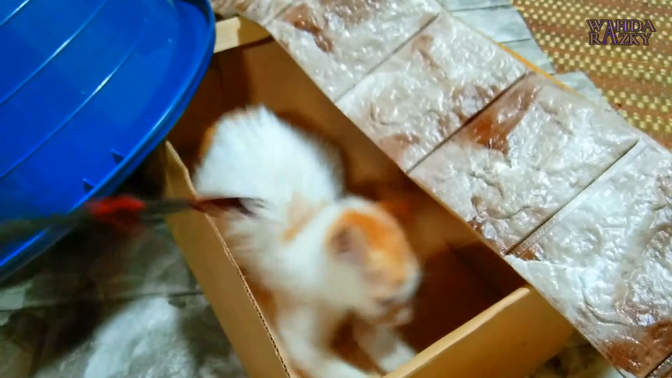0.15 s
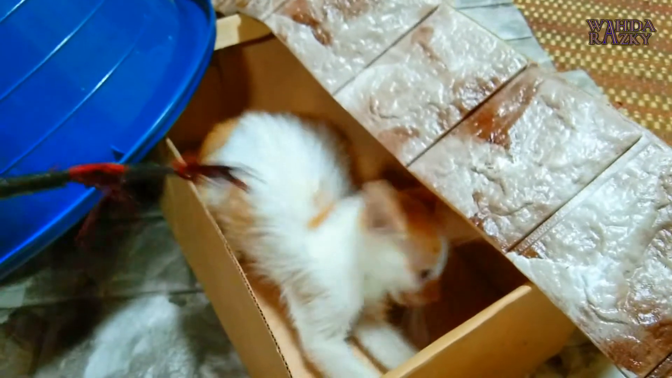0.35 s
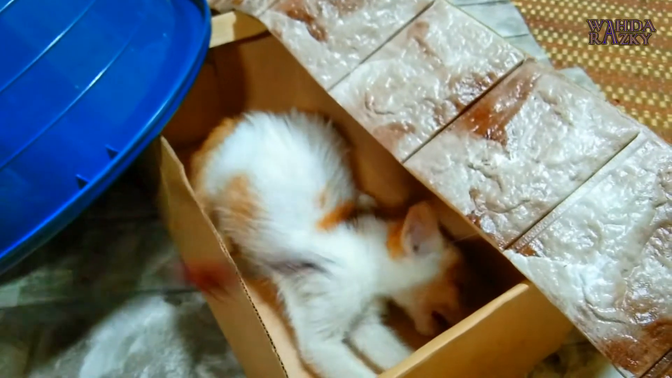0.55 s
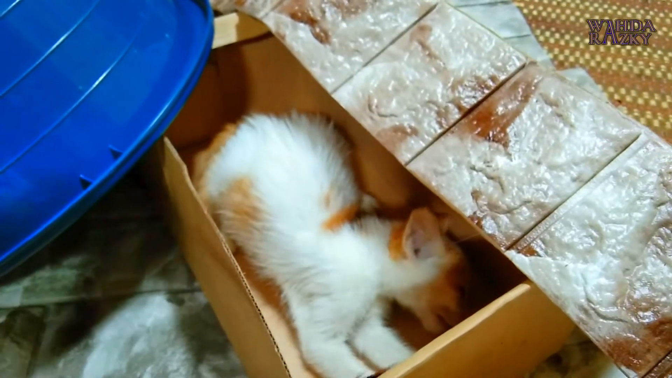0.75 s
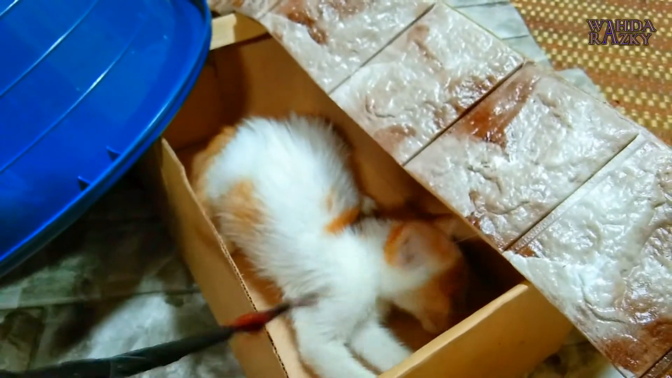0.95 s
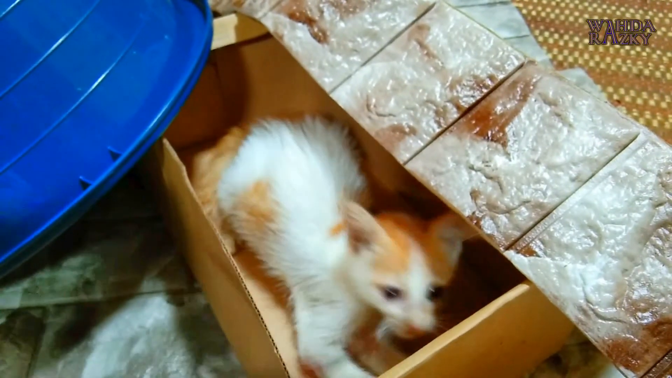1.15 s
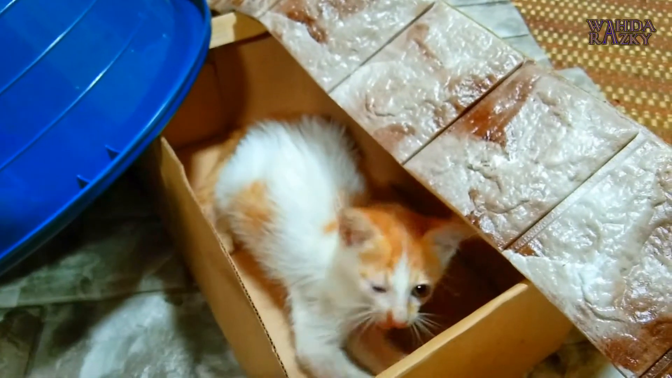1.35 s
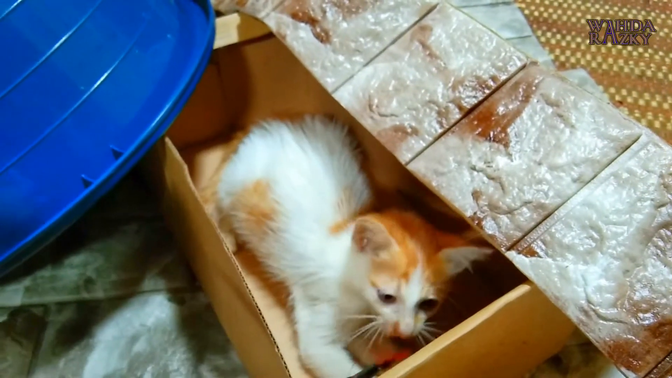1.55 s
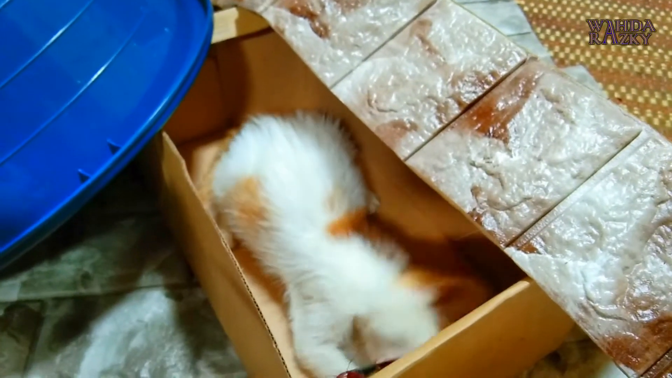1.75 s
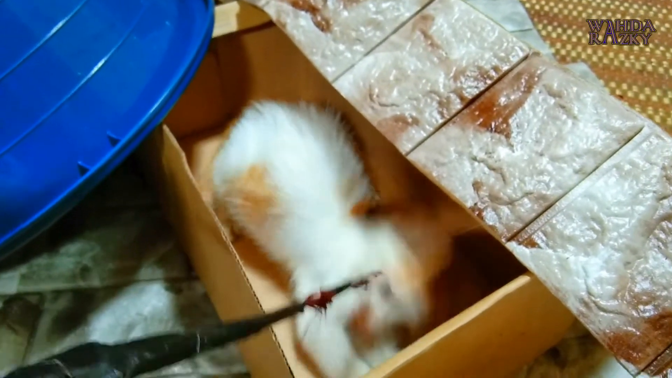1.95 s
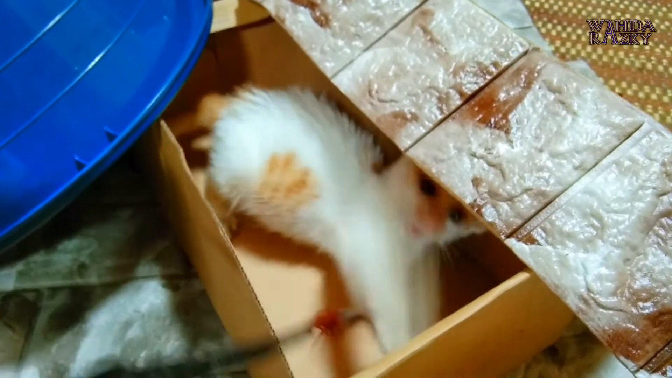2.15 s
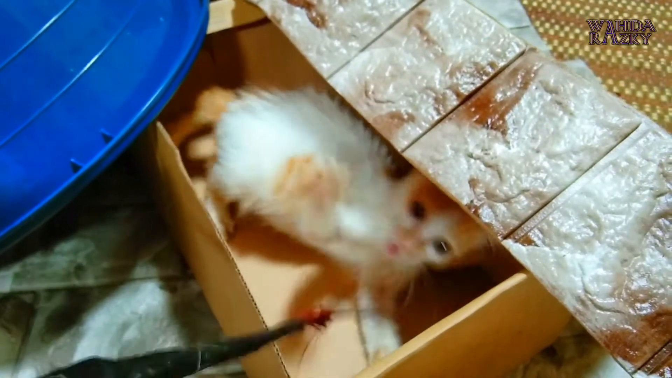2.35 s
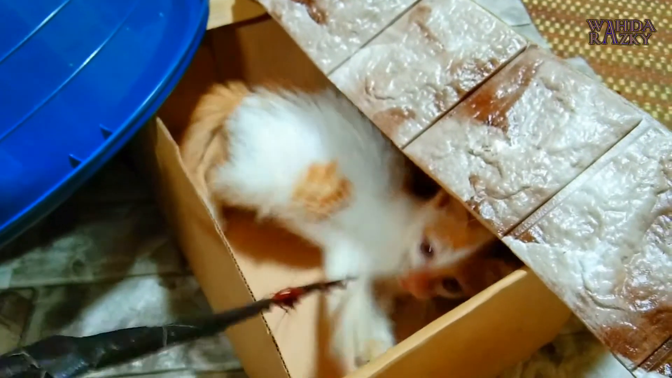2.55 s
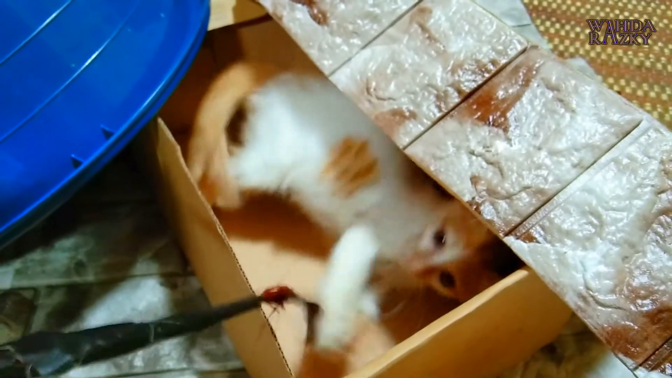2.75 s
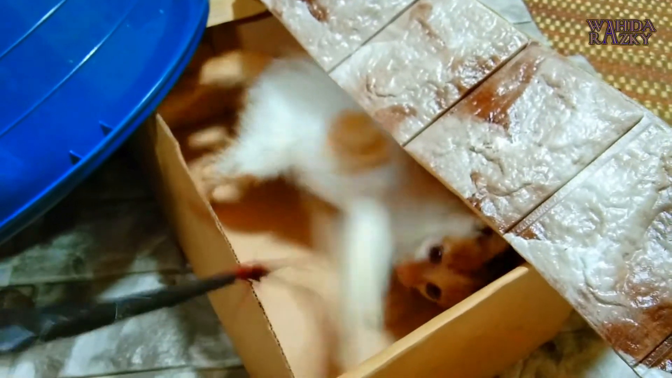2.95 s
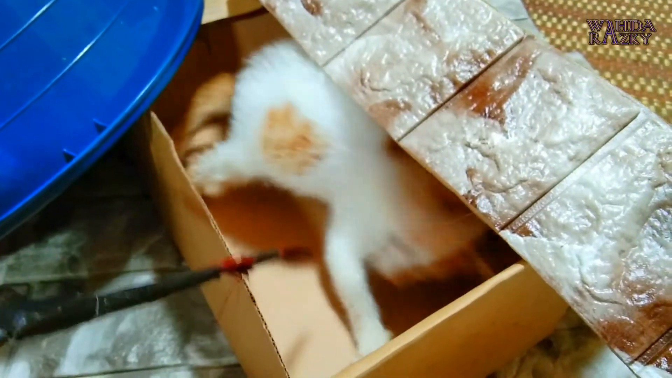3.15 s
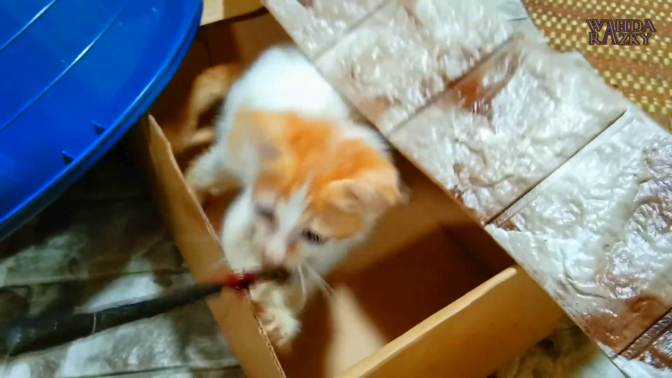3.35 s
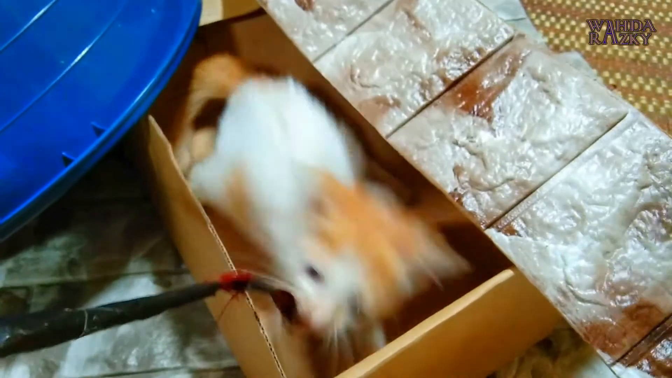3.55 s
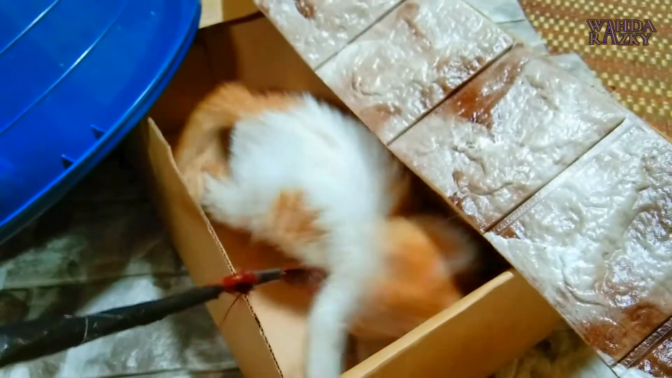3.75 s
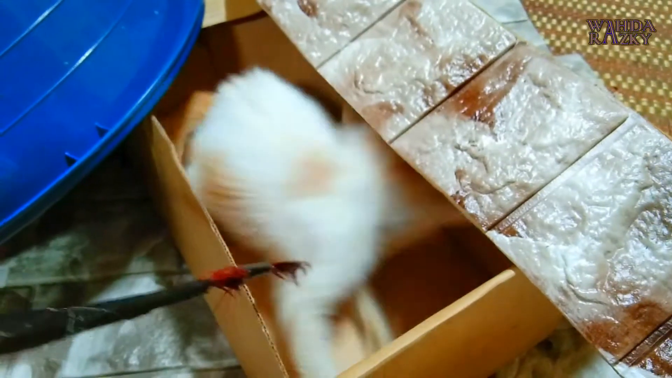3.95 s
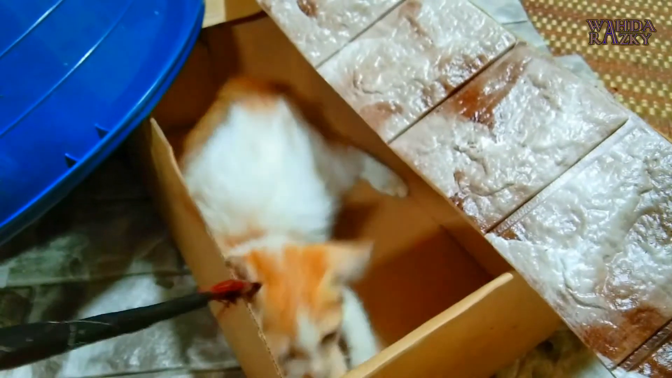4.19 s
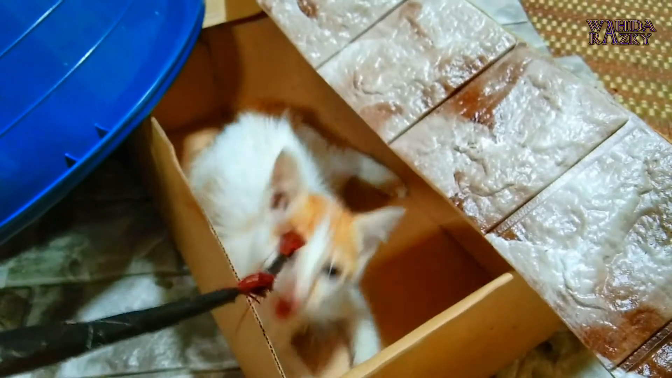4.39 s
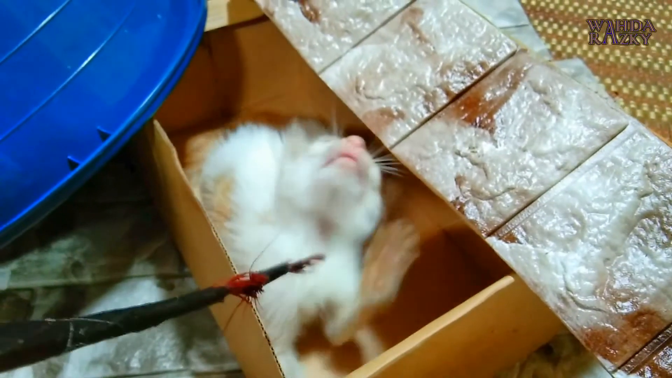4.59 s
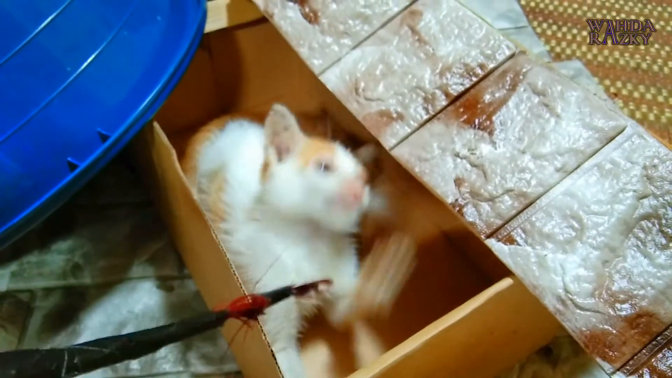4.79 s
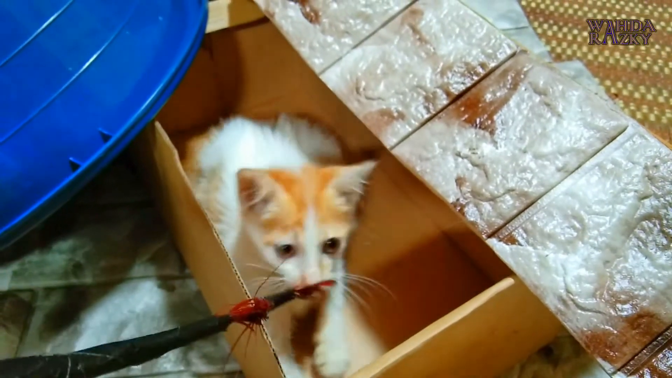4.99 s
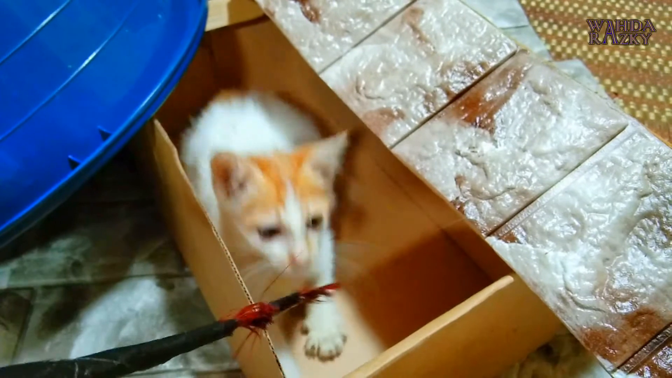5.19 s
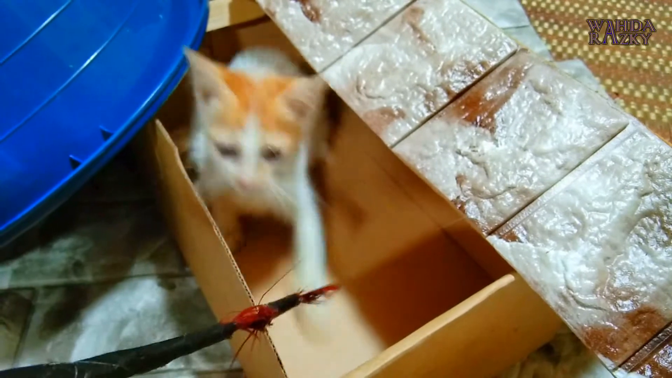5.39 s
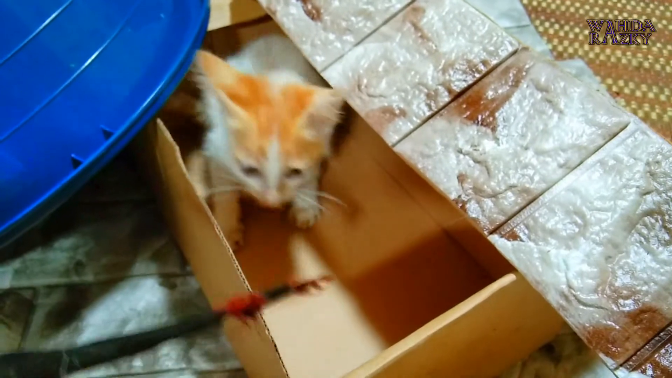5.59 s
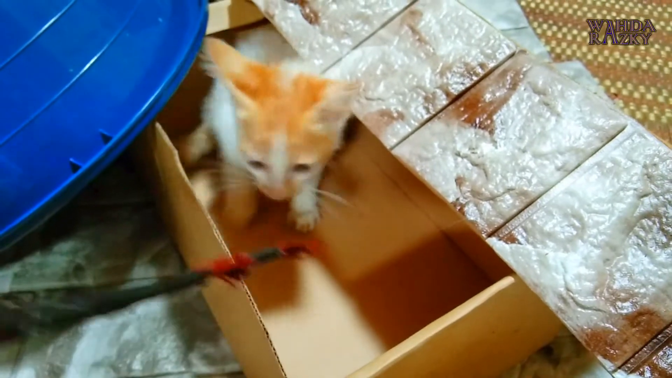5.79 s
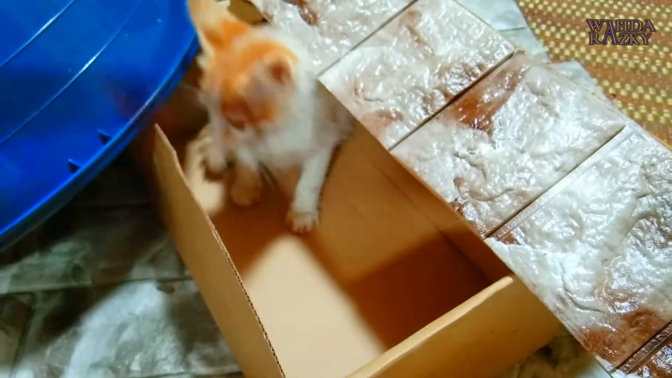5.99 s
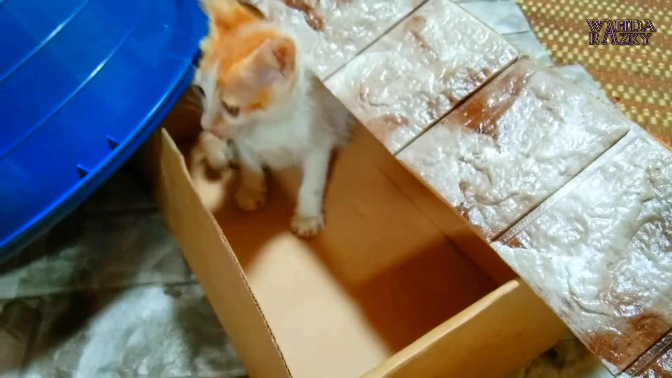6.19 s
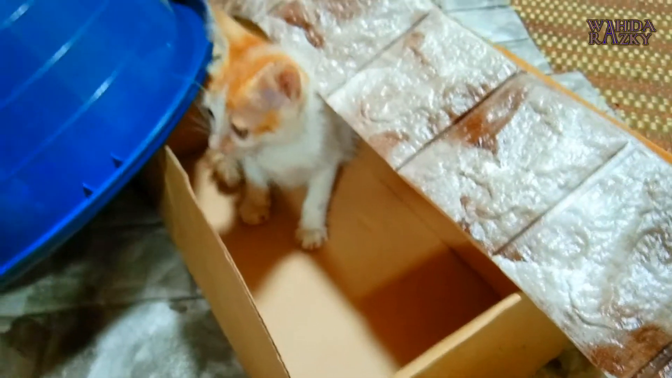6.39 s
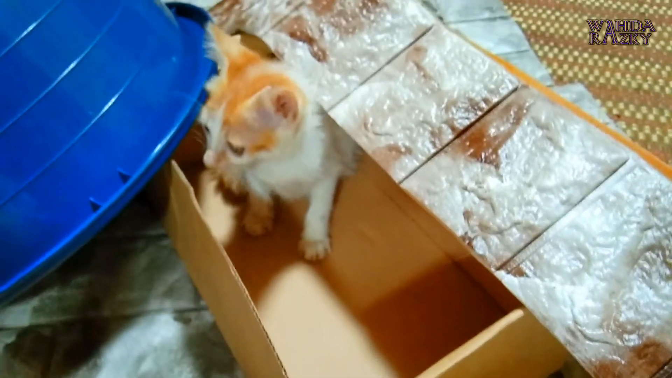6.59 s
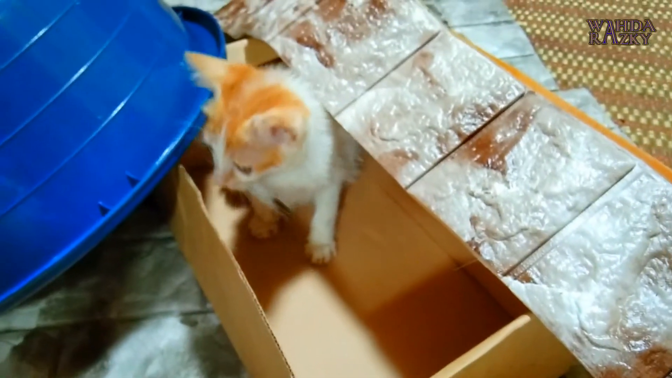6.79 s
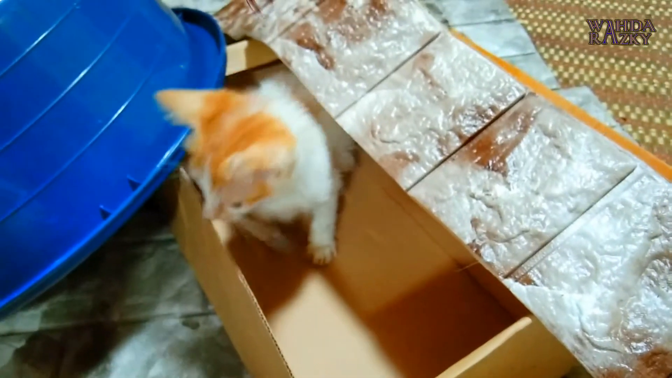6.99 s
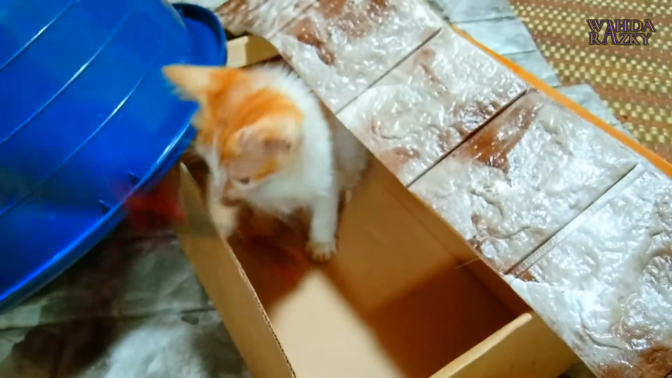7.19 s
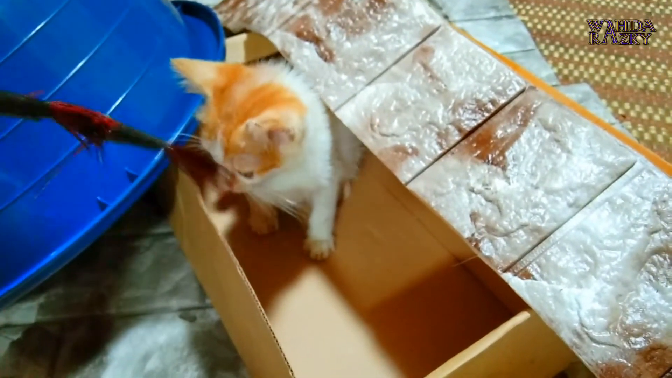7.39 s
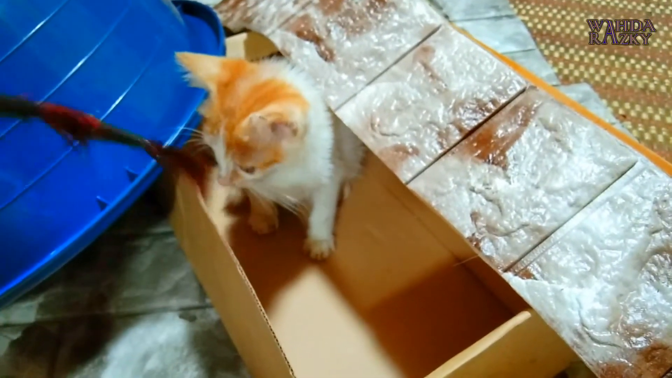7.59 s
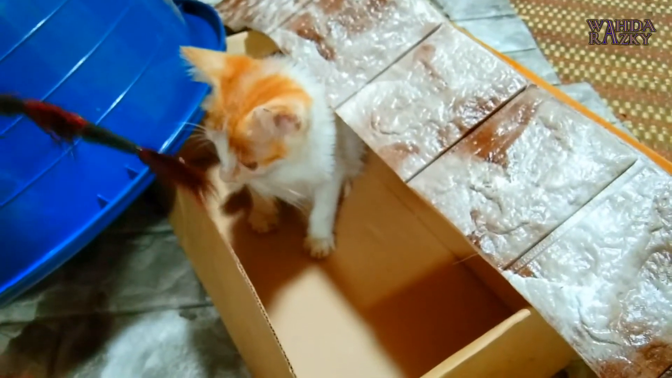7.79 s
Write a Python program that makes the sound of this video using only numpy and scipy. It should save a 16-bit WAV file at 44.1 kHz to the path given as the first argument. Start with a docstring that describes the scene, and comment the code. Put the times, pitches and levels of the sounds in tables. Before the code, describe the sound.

Close scrabbling in cardboard: sharp claw clicks, dry scrapes and small hollow knocks, busiest early, fading to a hushed room with faint insects.

```python
"""Kitten in a cardboard box

A kitten scrabbles and pounces in a cardboard box in a quiet room, close to a small microphone.
Claws drag over the board (many tiny random slips) and catch in it, paws thump the walls (sharp kicks);
the board answers with short ringing tones and the box with echoes. Behind it is a low room rumble (noise).
Two insects outside are narrow bands of noise: one swells and rises, one pulses steadily."""
import sys
import numpy as np
from scipy import signal
from scipy.fft import rfft, irfft
from scipy.io import wavfile
from scipy.ndimage import uniform_filter1d

SR = 44100
rng = np.random.default_rng(int(sys.argv[2]) if len(sys.argv) > 2 else 0)


def persist_wave(psi):
    """Save psi, clipped to +-1, as 16-bit WAV."""
    counts = np.round(np.clip(psi, -1, 1) * 32767).astype(np.int16)
    wavfile.write(sys.argv[1], SR, np.atleast_2d(counts).T)


N = 345744  # length in samples

# Tones of the box walls. Each row: pitch in Hz, relative level in dB, time to fade by 60 dB in seconds.
WALL_TONES = [(570, -11, 0.0055), (637, -3, 0.026), (843, -4, 0.024), (1027, -5, 0.018), (1251, 0.5, 0.015),
              (1435, -7.5, 0.011), (1660, -4, 0.016)]
# Tones of the board's paper skin. Each row: pitch in Hz, relative level in dB, time to fade by 60 dB in seconds.
SKIN_TONES = [(1854, 2, 0.0048), (2150, -9.5, 0.014), (2570, -7, .015), (3103, 7.5, 0.0045),
              (2930, -4, 0.0044), (3450, -0.5, 0.0041), (3630, -2.5, 0.011), (4130, 6, 0.004),
              (5140, -8, 0.004)]
# Spectrum of tearing fibres, which do not ring. Each row: frequency in Hz, relative level in dB per Hz.
FIBRE_SPECTRUM = [(2000, -35.5), (3600, -24), (5000, -17), (6500, -22.5), (8300, -34.5), (11000, -31.5),
                  (15500, -37.5)]


def gain_of(db):
    """Turns decibels into a gain."""
    return 10 ** (np.asarray(db) / 20)


def evened(x):
    """Scales a sound to an average (rms) level of 1."""
    return x / np.sqrt(np.mean(x ** 2) + 1e-20)


def peaked(x):
    """Scales a sound so that its highest peak is 1."""
    return x / (abs(x).max() + 1e-12)


def add(mix, s, sound):
    """Mixes a sound in at time s in seconds, cutting off what runs past the end."""
    part = mix[round(s * SR):][:len(sound)]
    part += sound[:len(part)]


def wander(size):
    """A slow random drift of rms 1: noise averaged twice over size samples."""
    once = uniform_filter1d(rng.standard_normal(N), size=size)
    return evened(uniform_filter1d(once, size=size))


def resonate(x, hz, width):
    """A resonance of gain 1: shifts the pitch hz down to zero, smooths, and shifts back; width in Hz."""
    turn = np.exp(2j * np.pi * np.cumsum(hz * np.ones(len(x))) / SR)
    r = np.exp(-np.pi * width / SR)
    smooth = signal.lfilter([1 - r], [1, -r], x / turn + 1e-18)
    return 2 * (turn * smooth).real


def coloured(x, points):
    """Filters x by a table of frequencies in Hz and levels in dB, joined by straight lines over log frequency."""
    hz, db = np.transpose(points)
    at = np.fft.rfftfreq(len(x), 1 / SR)
    level_db = np.interp(np.log(at + 1), np.log(hz), db)
    return irfft(rfft(x) * gain_of(level_db), len(x))


def ring(tones, near_hz, reach_db, place_db, detune):
    """Fading tones as struck at one random place: those near near_hz most, reach_db less per octave away."""
    hz, db, fade_s = np.transpose(tones)[:, :, None]
    place, shift, side = rng.standard_normal((3, len(tones), 1))
    t = np.arange(6000) / SR
    start_db = db + place_db * place - reach_db * abs(np.log2(hz / near_hz))
    level_db = start_db - 60 * t / np.minimum(fade_s, .2)
    soft_start = 1 - np.exp(-t * hz * 1.97)  # contact takes part of a cycle
    soft_end = np.cos(np.pi / 2 * t / t[-1])
    swing = np.sin(2 * np.pi * hz * (1 + detune * shift) * t) * np.sign(side)
    return gain_of(level_db) * soft_start * soft_end * swing


def pushed(rings):
    """Adds tones as a flat push starts them, all the same way: one clear first swing."""
    return (rings * np.sign(rings[:, 1:2])).sum(0)


def slips(size, per_s, spread_db):
    """Tiny slips at random times, of random sign and uneven size, the largest held in bounds."""
    chance, loud, sign = rng.random((size, 3)).T
    rank = -np.log(1.01 - loud)
    return (chance < per_s / SR) * gain_of(spread_db * rank) * np.sign(sign - .5)


def room_tone():
    """Steady rumble and hiss: filtered noise whose level wanders a little."""
    # Room spectrum. Each row: frequency in Hz, relative level in dB per Hz.
    room_spectrum = [(15, -49.5), (25, -27.5), (96, -1.5), (248, -1), (620, -18.5), (929, -18.5),
                     (1590, -22), (3490, -24), (6490, -29.5), (7420, -34), (8490, -40), (9460, -40.5),
                     (11400, -37.5), (12400, -50.5), (15800, -46)]
    level_db = -54 + 0.69 * wander(size=2000)
    return gain_of(level_db) * evened(coloured(rng.standard_normal(N), room_spectrum))


def swelling_insect():
    """Fast bursts of noise in a body resonance that rises and swells, then drops; others blur behind."""
    # One phrase of the song. Each row: share of the phrase from 0 to 1, pitch in Hz, level in dB.
    song = [(0, 7350, -79), (.2, 7200, -76), (.66, 7450, -72), (.7, 7600, -77), (.8, 7680, -72),
            (.99, 7750, -69), (1, 7750, -79)]
    phrase_s, phrase_end_s = 1.106, 0.503
    chorus_hz, chorus_db = 7500, -77.5  # more of the same kind, far off
    t = np.arange(N) / SR
    share, hz, db = np.transpose(song)
    now = (t - phrase_end_s) / phrase_s % 1
    clicks = .6 + np.exp(-(t * 187 % 1) / 0.48)  # 187 a second
    buzz = clicks * rng.standard_normal(N)
    pitch_hz = np.interp(now, share, hz) + 40. * wander(size=4000)
    near_db = np.interp(now, share, db) + 1.1 * wander(size=2500)
    near = gain_of(near_db) * evened(resonate(resonate(buzz, pitch_hz, 450.), pitch_hz, 450.))
    far = resonate(resonate(rng.standard_normal(N), chorus_hz, 800.), chorus_hz, 800.)
    far_db = chorus_db + 2.4 * wander(size=8000)
    return near + gain_of(far_db) * evened(far)


def pulsing_insect():
    """A narrow band of noise that throbs, a little unevenly, and never quite stops."""
    pitch_hz, middle_db, pulses_per_s, first_pulse_s = 9460, -82.5, 7.72, .003
    t = np.arange(N) / SR
    beat = np.cos(2 * np.pi * pulses_per_s * (t - first_pulse_s) + .3 * wander(size=6000))
    hiss = resonate(resonate(rng.standard_normal(N), pitch_hz, 600.), pitch_hz, 600.)
    level_db = middle_db + 4. * np.tanh(1.7 * beat) + 1.2 * wander(size=5000)
    return gain_of(level_db) * evened(hiss)


def reflections(x):
    """Dense echoes of random sign from the box and the room, dying fast; three echo paths take turns."""
    t = np.arange(SR // 2) / SR
    turn = np.arange(N) / SR / 0.4103
    echoes = 0
    for k in range(3):
        fading = gain_of(-60 * t / 0.1) + gain_of(-6 - 60 * t / 0.47)  # a short and a long tail
        taps = slips(len(t), 6000., 1.5) * fading * (t > .004)
        sent = x * np.cos(np.pi * (turn + k / 3))
        echoes += signal.oaconvolve(sent, taps / np.linalg.norm(taps))[:N]
    return echoes


def rubbed(tones, size, clump_db, roam_db):
    """Each tone gets its own slips, in clumps of a few ms, and comes and goes as the claws cross the board."""
    rings = ring(tones, 1000, 0, .5, .01)[:, :2048]
    chance = rng.standard_normal((size, len(tones)))
    clumps = uniform_filter1d(chance, size=250, axis=0).T
    roam = uniform_filter1d(chance, size=1500, axis=0).T
    drive = []
    for c, r in zip(clumps, roam):
        level_db = clump_db * evened(c) + roam_db * evened(r)
        drive.append(slips(size, 1500., 3.5) * gain_of(level_db))
    sound = signal.oaconvolve(np.array(drive), rings, axes=1).sum(0)
    return evened(sound[2048:size])  # without the build-up at the start


def board():
    """What any drag excites: slips that ring the skin and walls, and dry fibres tearing along with them."""
    size = N + 2048
    rasp = rubbed(SKIN_TONES, size, 2.8, 3.0)
    tear = evened(coloured(slips(N, 9000., 2.), FIBRE_SPECTRUM))
    return rasp, tear, rubbed(WALL_TONES, size, 1.3, 1.3)


def stroke(surface, s, rasp_db, swell, hold, fade, fibres_db, walls_db):
    """One drag: pressure swells, holds and fades over a random stretch of the board's sound."""
    lift_db = -30  # level at both ends, against full pressure
    swell, hold, fade = max(swell, .003), max(hold, 0), max(fade, .003)
    t = np.arange(-swell, hold + fade, 1 / SR)
    lifted = np.maximum(np.maximum(-t / swell, (t - hold) / fade), 0)
    press_db = rasp_db + lift_db * lifted
    at = rng.integers(N - SR)
    rasp, tear, drum = (evened(layer[at:][:len(t)]) for layer in surface)
    return s - swell, gain_of(press_db) * (rasp + gain_of(fibres_db) * tear + gain_of(walls_db) * drum)


def blow(s, snap_db, snap_hz, tear_db, knock_db, knock_hz, thump_db):
    """One sharp kick, then the board crumples for a few ms; walls and box ring lower and longer."""
    # Tones of the whole box. Each row: pitch in Hz, relative level in dB, time to fade by 60 dB in seconds.
    box_tones = [(107, -7, 0.058), (242, 4, 0.1), (302, 8.5, 0.049), (400, -13, 0.011)]
    crumple_s = 0.02  # time for the crumpling to fade by 60 dB
    place_db, reach_db = 1.5, 8.
    kick = 40  # sample at which the kick lands
    t = np.arange(3000) / SR
    drive = slips(len(t), 5000., 3.4) * gain_of(-1.0 - 60 * t / crumple_s)
    drive[kick] += 2.5
    drive[:kick] = 0
    fibre_click = coloured(signal.unit_impulse(64, "mid"), FIBRE_SPECTRUM)
    tear = signal.oaconvolve(drive, fibre_click)[24:]
    skin = ring(SKIN_TONES, snap_hz, reach_db, place_db, 0.018).sum(0)
    snap = peaked(signal.oaconvolve(drive, skin))
    drive[kick] *= 5.  # the heavier walls answer mostly to the kick
    walls = pushed(ring(WALL_TONES, knock_hz, reach_db, place_db, .025))
    knock = peaked(signal.oaconvolve(drive, walls))
    thump = peaked(pushed(ring(box_tones, 230, 0, place_db, 0.021)))
    sound = gain_of(snap_db) * snap + gain_of(knock_db) * knock
    add(sound, 0, gain_of(tear_db) * peaked(tear))
    add(sound, 0, gain_of(thump_db) * thump)
    return s, sound


def scene():
    """Adds up the kitten's drags and blows, their echoes, the room and the insects."""
    # Claws or fur dragged over the board. Each row: time of full pressure in seconds, rasp level in dB,
    # swell, hold and fade in seconds, then against the rasp: dry fibres in dB, wall drumming in dB.
    drags = [(0.051, -47.5, 0.014, 0.037, 0.13, -3.5, -13), (.178, -47.5, 0.0086, 0.032, 0.05, -2, -8),
             (0.229, -36, 0.0084, 0.013, .035, -6.5, -2), (0.272, -33.5, 0.0033, 0.0033, 0.051, -6, -8),
             (0.301, -44, 0.0095, 0.0125, .03, -8, -11), (0.384, -56.5, 0.019, 0.051, 0.16, -6, -5),
             (.55, -59.5, 0.21, 0.038, .2, -5, -4), (1.028, -52.5, .11, 0, 0.094, -13, -5),
             (1.346, -58.5, 0.0047, 0, 0.072, -2, 9), (1.505, -48.5, 0.0046, 0, 0.07, 1, 5),
             (1.77, -60, 0.11, 0.056, .03, -7, -6), (1.868, -36.5, .015, 0.0067, 0.049, -9.5, -13.5),
             (2.065, -49, .03, 0.072, 0.023, -9, -8), (2.104, -42, .04, 0.012, 0.0092, -7, -16),
             (2.206, -47, .055, 0.034, 0.13, -6, -4.5), (2.294, -18.5, 0.013, .004, 0.021, -7, -15),
             (2.304, -33, 0.0046, .014, 0.021, -7, -17), (2.35, -36.5, 0.014, 0.0019, 0.027, -1, 8),
             (2.37, -50.5, .02, 0.021, 0.15, -1.5, 3), (2.49, -51, 0.02, 0.0057, .056, -1.5, -16),
             (2.559, -32.5, 0.0045, 0.011, 0.017, -5.5, -13), (2.603, -43, 0.011, 0.0068, 0.043, -8, 0),
             (2.672, -48.5, 0.0098, 0.051, 0.013, -3, -12), (2.765, -57, 0.029, 0.00085, 0.05, -2, -1.5),
             (2.84, -55, 0.055, 0.11, 0.21, -11, -3.5), (3.081, -40, 0.031, 0.07, 0.008, -4.5, -9.5),
             (3.158, -28.5, 0.014, 0.021, 0.039, -14.5, -21), (3.235, -31.5, .015, 0.0096, 0.018, -11, -9),
             (3.278, -34, 0.0052, .11, 0.031, -10, -19), (3.43, -42, 0.0094, 0.029, 0.11, 2, -4),
             (3.475, -39, 0.017, 0.011, 0.075, -5.5, 2), (3.51, -48, 0.028, 0.058, 0.13, -9, 0),
             (3.592, -32, .004, 0.019, 0.023, -4, -6.5), (3.647, -35.5, 0.0047, 0.0038, 0.062, -3.5, 0),
             (3.705, -34.5, 0.042, 0.0039, 0.14, -13.5, -10), (3.859, -49.5, 0.13, 0.055, 0.018, -5.5, -15),
             (3.98, -44.5, 0.046, 0.023, .05, -3, -7), (4.039, -49, 0.029, 0.13, 0.016, -4, -9.5),
             (4.111, -36.5, 0.048, 0.017, 0.026, -6.5, -17), (4.215, -40, 0.008, 0.0074, 0.047, -4, 9),
             (4.225, -28.5, 0.019, 0.056, 0.0071, -8.5, -23),
             (4.295, -44.5, 0.0041, 0.0088, 0.055, -5, -14), (4.414, -57, 0.019, 0.027, 0.049, -12, -13),
             (4.502, -50, 0.0084, 0.012, .06, -13, -14), (4.563, -52, 0.031, 0.047, .07, -1.5, -11),
             (4.652, -64.5, .03, 0.00057, 0.21, -8, -4), (4.93, -59.5, 0.019, 0, 0.27, 2, -0.5),
             (5.084, -60, .03, .05, 0.095, -0.5, -8.5), (5.28, -48.5, 0.075, 0.0024, .07, -2.5, -12.5),
             (5.453, -49.5, 0.027, 0.044, 0.23, 0.5, -9), (5.521, -60, .05, .19, .03, 0.5, -17),
             (5.944, -54, 0.14, 0.002, 0.13, -4, -12.5), (6.06, -61.5, 0.21, 0, .3, -1.5, -19),
             (7.116, -58.5, 0.022, 0.02, 0.079, -7, -6), (7.259, -58, 0.067, .085, 0.034, 3.5, -10),
             (7.737, -46.5, .012, 0.013, 0.11, -24, -16.5)]
    # Claws catching and paws landing, and two dry taps on a toy (1.34 s and 1.50 s). Each row: start in
    # seconds, snap peak in dB, snap pitch in Hz, # fibre tear in dB, wall knock in dB, knock pitch in Hz, box
    # thump in dB.
    catches = [(0.17, -21, 4460, -17, -34, 1300, -59), (0.1956, -42, 4360, -41, -29.5, 659, -32),
               (0.2151, -18.5, 4640, -17, -18, 630, -27.5), (0.2168, -21.5, 3670, -28, -55, 676, -48),
               (0.2708, -25.5, 4500, -42, -40, 1400, -46), (0.3677, -30, 4380, -45, -69, 536, -66),
               (.381, -42, 4380, -55, -66, 1300, -64), (1.067, -39.5, 3300, -55, -52, 1600, -69),
               (1.244, -43, 4400, -55, -64, 1600, -66), (1.3395, -24.5, 3920, -29.5, -25.5, 832, -41.5),
               (1.498, -17, 4180, -15.5, -18, 1400, -38), (1.7666, -35, 3900, -60, -58, 1150, -52),
               (1.8103, -35.5, 3800, -64, -49, 1670, -60), (1.932, -42, 3250, -60, -54, 1710, -62.5),
               (2.018, -39, 3800, -52, -46, 1040, -70), (2.0654, -31.5, 3470, -50, -39, 1080, -66),
               (2.2835, -8.5, 2580, -9, -20, 1700, -31.5), (2.2877, -4, 3960, -36, -27, 495, -61),
               (2.3356, -0.5, 2650, -33, -13, 1640, -36), (2.5564, -13.5, 2600, -26, -35, 1770, -59),
               (2.5925, -14, 2870, -14.5, -20, 1310, -42), (3.137, -14, 3080, -37, -14.5, 1300, -60),
               (3.1467, -13, 3000, -40, -48, 1030, -57), (3.2224, -11.5, 3060, -35, -25, 1360, -63),
               (3.2787, -24, 3080, -48, -62, 1370, -66), (3.4195, -10.5, 3100, -2.5, -17, 630, -43),
               (3.458, -13, 2600, -32, -13, 1260, -32), (3.6624, -17, 2880, -33, -32, 1200, -35.5),
               (3.679, -7.5, 2720, -11, -24, 1090, -62), (3.8068, -34, 2950, -56, -54, 452, -65),
               (3.937, -41, 4420, -55, -47, 495, -57), (3.9569, -36.5, 3800, -47, -54, 549, -48),
               (3.99, -28, 3340, -40, -29, 1800, -52), (4.027, -20, 2880, -49, -63, 1780, -52),
               (4.092, -33, 3310, -48, -54, 1180, -60), (4.1823, -33, 3960, -46, -50, 630, -53),
               (4.2062, -41, 2590, -39, -26, 616, -29), (4.412, -40, 3930, -61, -56, 579, -60),
               (4.4944, -30.5, 3600, -59, -50, 1660, -52), (4.9096, -35, 4080, -47, -23, 622, -26.5),
               (5.0086, -38, 4080, -61, -61, 452, -55), (5.047, -48, 4800, -54, -66, 1300, -65),
               (5.1174, -37, 2000, -41, -64, 1170, -59), (5.2741, -32, 3800, -56.5, -57, 1040, -54),
               (5.627, -48.5, 4580, -62, -44, 484, -45.5), (6.793, -39, 1860, -58.5, -37, 1510, -40.5),
               (6.832, -44, 2980, -58.5, -48, 584, -63.5), (7.198, -43, 3640, -68, -54.5, 686, -55),
               (7.7345, -40.5, 3100, -56.5, -58, 1790, -64)]
    # The box heard through a small microphone port. Each row: frequency in Hz, level in dB.
    port = [(40, -49), (150, -0.5), (400, -2.5), (5500, -1), (7000, -4.5), (9000, -9), (16000, -26)]
    box, surface = np.zeros(N), board()
    for row in drags:
        add(box, *stroke(surface, *row))
    for row in catches:
        add(box, *blow(*row))
    box = coloured(box + gain_of(-18.5) * reflections(box), port)
    return (box + room_tone() + swelling_insect() + pulsing_insect())[None]


def record(dry):
    """Rounds off the loudest snaps near full scale, then removes everything above the band edge."""
    edge_hz = 15700
    rounded = dry / (1 + (dry / .97) ** 12) ** (1 / 12)
    low_pass = signal.firwin(511, edge_hz, window=("kaiser", 9), fs=SR)
    return signal.oaconvolve(rounded, low_pass[None], "same")


dry = scene()
out = record(dry)
persist_wave(out)
```